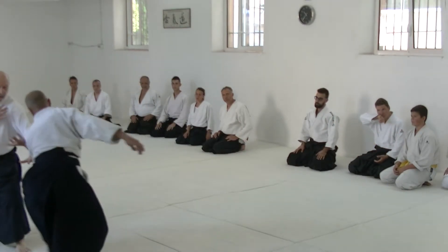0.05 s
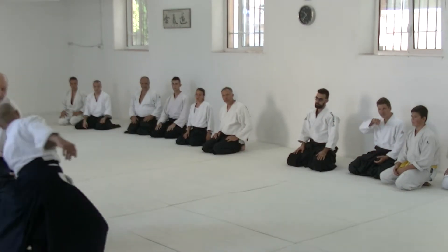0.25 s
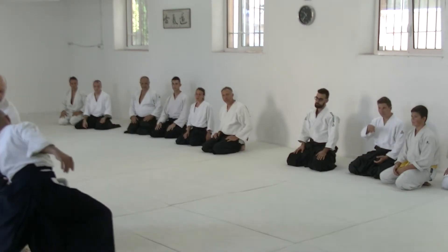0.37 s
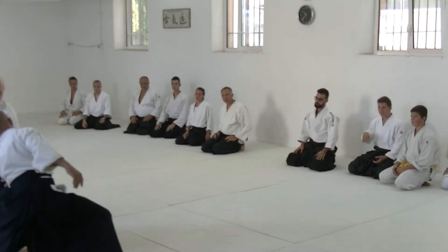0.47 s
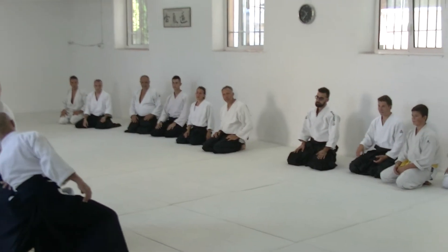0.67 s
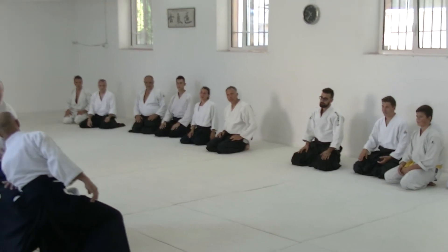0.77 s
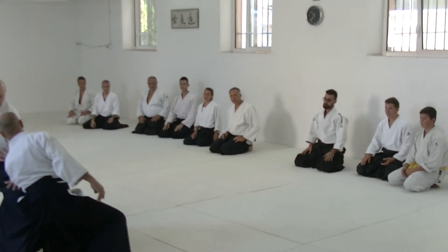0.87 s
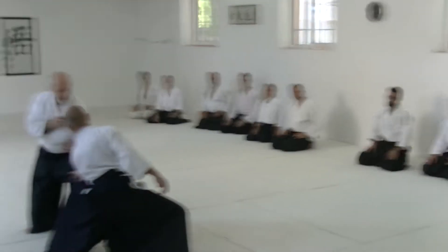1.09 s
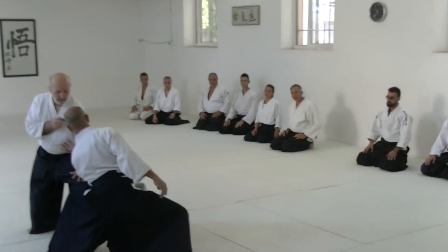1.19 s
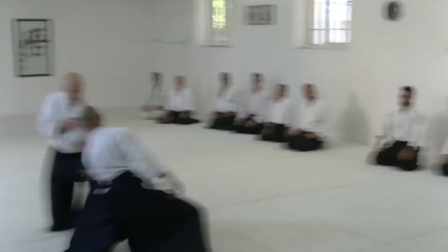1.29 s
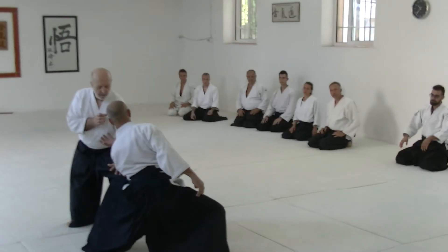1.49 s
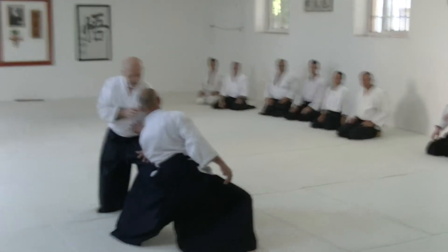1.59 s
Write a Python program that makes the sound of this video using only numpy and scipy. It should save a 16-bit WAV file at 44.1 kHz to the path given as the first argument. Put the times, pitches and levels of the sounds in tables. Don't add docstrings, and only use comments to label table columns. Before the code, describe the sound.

A body thuds heavily onto a padded mat in an echoing hall, then three sharp clicks

```python
import sys
import numpy as np
from scipy import signal
from scipy.fft import rfft, irfft
from scipy.io import wavfile
from scipy.ndimage import uniform_filter1d

SR = 44100
rng = np.random.default_rng(int(sys.argv[2]) if len(sys.argv) > 2 else 0)


def int16_out(signal):
    q = np.round(np.clip(np.atleast_2d(signal).T, -1, 1) * 32767)
    wavfile.write(sys.argv[1], SR, q.astype(np.int16))


def invert_db(x):
    u = np.asarray(x, float) / 20
    return 10 ** u


N = 72765
LEAD_S = .4

# f/Hz, density/(dB per Hz)
AIR_SPECTRUM = [(15, -35), (25, 3.5), (70, -11), (394, -9), (545, -12), (863, -12), (1230, -16),
                (1400, -18), (16000, -37)]
# f/Hz, coefficient/1
AIR_CORRELATION = [(60, 0.89), (180, 0.61), (550, 0.73), (1650, 0.42), (4970, -0.23), (15000, 0.2)]
# f/Hz, T60/s
HALL_DECAY = [(60, 0.8), (150, 0.83), (400, 0.71), (1200, 0.75), (4000, 0.74), (12000, 0.49)]
# f/Hz, level/dB
HALL_SPECTRUM = [(40, -11), (100, -3), (160, -7.5), (250, 3.5), (500, 0.5), (1500, 3), (5000, -2.5),
                 (14000, 1.5)]
# f/Hz, coefficient/1
HALL_CORRELATION = [(60, 0.93), (180, 1), (550, 0.93), (1650, 0.38), (4970, -0.38), (15000, 0.092)]
# f/Hz, density/(dB per Hz)
SHUDDER_SPECTRUM = [(25, 1), (40, -19), (52, 1), (70, -5), (98, 5), (130, -1), (300, -50)]

# f/Hz, density/(dB per Hz)
CLICK_SPECTRUM = [(900, 7), (1650, -14), (2100, -6), (2700, -2), (3500, -20), (8000, -11), (16000, -27)]
# f/Hz, left level/dB, right level/dB, T60/s
CLICK_MODES = [(1640, -4, -7, 0.018), (2650, -2, 3, 0.015), (4170, -7, -13, .012), (5170, -6, -11, .012),
               (6900, -13, -15, .01)]

# t/s, snap level/dB, lead of scrape/s, scrape level/dB, spring level/dB
LATCH_SNAPS = [
    (1.0788, -14.5, 0.0053, -27, -50),
    (1.3383, -17.5, 0.0068, -30.5, -49.5),
    (1.5841, -20.5, 0.0053, -43, -51),
]
# f/Hz, density/(dB per Hz)
SNAP_SPECTRUM = [(880, -28), (1500, -4.5), (3410, -4.5), (8160, -9.5), (10300, -12), (11700, -7.5),
                 (16000, -24)]
# f/Hz, density/(dB per Hz)
RATTLE_SPECTRUM = [(700, 8.5), (1100, 11.5), (2000, -13), (3200, 15.5), (5000, -22), (9000, -30),
                   (16000, -38)]
# f/Hz, left level/dB, right level/dB, T60/s
LATCH_MODES = [(967, -5.5, -29.5, 0.049), (1323, -19.5, -12.5, 0.069), (2600, -13, -7, 0.026),
               (3335, -14.5, -4.5, 0.022), (4230, -41, -37, 0.16), (5360, -13, -5, 0.028),
               (5879, -14, -32.5, 0.086), (8140, -7, -35, 0.024), (9650, -18, -28, 0.021),
               (13810, -31, -40, 0.044)]

# t/s, knock level/dB, strike level/dB, left tick level/dB, right tick level/dB
LEVER_KNOCKS = [
    (1.024, -10.5, -10.5, -11.5, -17),
    (1.0527, -39, -39, -31, -37),
    (1.092, -25.5, -40, -60, -60),
    (1.2850, -12.5, -32.5, -35, -32.5),
    (1.2912, -20, -55, -48, -51),
    (1.5300, -15, -25.5, -36, -34),
    (1.5359, -24, -38, -56, -48),
]
# f/Hz, left level/dB, right level/dB, T60/s
ROCKING_MODES = [(100, -32, -21, 0.19), (208, -21.5, -10, 0.08), (278, -2, -2.5, .06),
                 (351.4, -3.5, 5.5, 0.066)]
# f/Hz, left level/dB, right level/dB, T60/s
SHAKING_MODES = [(388.8, -8.5, -8, 0.085), (587, -8, -17, 0.056), (658, -17, -29.5, 0.073),
                 (862, -18, -20, 0.041), (1043, -16, -26, 0.067), (1150, -20.5, -15, 0.032),
                 (1240, -24, -24.5, 0.035)]
# f/Hz, left level/dB, right
# level/dB, T60/s
STRUCK_MODES = [(451, 2, -17, 0.052), (558, -4.5, -13, 0.053), (689.4, -4.5, -18, 0.066),
                (769, 2, -23, 0.022), (923, -22, -1, 0.024), (1097, -26, 4.5, 0.014),
                (1292, -12, -6.5, 0.052), (1980, -18, -28, 0.022)]
# f/Hz, density/(dB per Hz)
TICK_SPECTRUM = [(880, -45), (1500, 3), (4590, -9), (5380, -8.5), (9280, -14), (12000, -6), (16000, -25)]
# f/Hz, density/(dB per Hz)
BUZZ_SPECTRUM = [(300, -23), (600, -37), (1000, 3.5), (2500, -6), (6000, -22), (10000, -30), (16000, -58)]

# start t/s, swell/s, fade/s, level/dB
CLOTH_DRAGS = [
    (-.05, 0.041, 0.18, -49),
    (0.171, 0.041, 0.0033, -40.5),
    (0.235, 0.0083, 0.059, -33.5),
    (0.393, 0.036, 0.029, -36),
    (0.469, 0.031, 0.088, -60),
]
# f/Hz, density/(dB per Hz)
CLOTH_SPECTRUM = [(530, 15), (900, 2), (1280, -9), (1490, -3), (1640, -7.5), (5890, -9), (16000, -21.5)]
# t/s, level/dB, brightness/1
PALM_CRACKS = [(0.2119, -30, 0), (0.214, -37, 0.4), (0.2189, -29, 0.1), (0.2227, -23, 0.6),
               (0.2254, -40.5, 0.37), (0.2374, -36, 0), (0.239, -28.5, 0.37), (0.2485, -32, 0.06),
               (.2520, -36, .1), (.4280, -35.5, 0.33)]
# f/Hz, density/(dB per Hz)
DULL_SPECTRUM = [(800, -8), (2000, 6), (4500, -9.5), (8000, -19), (16000, -43)]
# f/Hz, density/(dB per Hz)
BRIGHT_SPECTRUM = [(2000, -2), (6000, -3.5), (11500, 0.5), (14000, -4), (16500, -32)]
# t/s, thud level/dB, thud f/Hz, swings of the floor/1, slap level/dB
LIMB_LANDINGS = [(-.09, -7, 498, 0.37, -32), (-.05, -17, 220, 0.3, -36.5), (-.02, -15, 121, 0.75, -27),
                 (.020, -25.5, 216, 1.13, -70), (0.205, -10, 255, 0.31, -34), (0.211, -2, 169, 0.3, -32.5),
                 (.2170, -8, 167, 0.2, -37), (0.2231, -1.5, 177, 0.37, -23.5),
                 (0.219, -16, 505, 1.75, -27.5), (0.2374, -18, 220, 0.43, -40), (0.259, -17, 410, 0.8, -28),
                 (.2950, -15, 202, 0.66, -41), (.4020, -25.5, 200, 0.94, -73),
                 (0.4382, -21, 470, 0.63, -44.5), (0.445, -25.5, 530, 1.74, -53), (0.451, -22, 130, 1, -71),
                 (.5000, -24, 103.8, 6.1, -40.5)]
# f/Hz, density/(dB per Hz)
SLAP_SPECTRUM = [(600, 9), (1000, 1.5), (2000, -5), (3500, -7.5), (6000, -14.5), (11500, -23), (16000, -44)]


def read(points, hz):
    f, value = np.transpose(points)
    return np.interp(np.log(hz + 1), np.log(f + 1), value)


def evened(x):
    return x / np.sqrt(np.mean(x ** 2) + 1e-20)


def add(mix, s, sound):
    part = mix[..., max(round(s * SR), 0):][..., :sound.shape[-1]]
    part += sound[..., :part.shape[-1]]


def coloured(points, size, low_hz, channels=2):
    hz = np.fft.rfftfreq(size, 1 / SR)
    white = rfft(rng.standard_normal((channels, size)))
    gain = invert_db(read(points, hz)) / (1 + (low_hz / (hz + 1)) ** 4)
    return evened(irfft(white * gain, size))


def burst(t, rise, fall):
    u = np.maximum(t, 0)
    return (1 - np.exp(-u / rise)) * np.exp(-u / fall)


def pair(size, same, shape):
    frames, hz = size // 256 + 5, np.fft.rfftfreq(1024, 1 / SR)[:, None]
    a, b, c, d = rng.standard_normal((frames, 513, 4)).T
    like = np.clip(read(same, hz), -1, 1)
    left, other = a + 1j * b, c + 1j * d
    right = like * left + np.sqrt(1 - like ** 2) * other
    z = np.array([left, right]) * invert_db(shape(hz, np.arange(frames) * 256 / SR))
    return evened(signal.istft(z, nperseg=1024, noverlap=768)[1][:, :size])


def rings(modes, t, left_sign):
    hz, left_db, right_db, t60 = np.transpose(modes)[:, :, None]
    tones = np.sin(2 * np.pi * hz * t) * invert_db(-60 * t / t60)
    left = (invert_db(left_db) * tones).sum(0)
    right = (invert_db(right_db) * tones).sum(0)
    return np.array([left_sign * left, right])


def pushed(rung, push_s):
    push = np.exp(-2 * (np.arange(300) / SR / push_s - 2) ** 2)
    return signal.oaconvolve(rung, push[None] / push.sum(), axes=1)[:, :rung.shape[1]]


def low_cut(x, cut_hz):
    return signal.sosfilt(signal.butter(3, cut_hz, "high", fs=SR, output="sos"), x)


def air():
    def swell(t):
        waves = [np.sin(2 * np.pi * (f * t + rng.random())) / np.sqrt(f) for f in np.geomspace(.5, 12, 20)]
        return evened(sum(waves))

    level_db = -52
    return invert_db(level_db) * pair(N, AIR_CORRELATION, lambda hz, t: read(AIR_SPECTRUM, hz) + swell(t))


def hall(x):
    level_db, delay_s = -4.5, 0.0048
    tail = pair(SR, HALL_CORRELATION, lambda hz, t: read(HALL_SPECTRUM, hz) - 60 * t / read(HALL_DECAY, hz))
    tail = tail * np.clip(np.arange(SR) / SR / delay_s - .5, 0, 1)
    response = tail / np.linalg.norm(tail[0])
    return invert_db(level_db) * signal.fftconvolve(x[None], response, axes=1)[:, :len(x)]


def shudder(blows):
    level_db, fade_s = -33, 0.061
    keep = np.exp(-1 / (fade_s * SR))
    power = np.minimum(uniform_filter1d(blows ** 2, size=900), .004)
    force = np.sqrt(signal.lfilter([1 - keep], [1, -keep], power) + 1e-12)
    return invert_db(level_db) * force / force.max() * coloured(SHUDDER_SPECTRUM, len(blows), 11, channels=1)


def click():
    t = np.arange(5000) / SR
    noise = invert_db(-2) * burst(t, 0.0002, .0022) * coloured(CLICK_SPECTRUM, len(t), 770)
    modes = rings(CLICK_MODES, t, 1) * np.minimum(t / 0.002, 1)
    return invert_db(-22) * (noise + modes)


def snaps():
    out, t = np.zeros((2, N)), np.arange(12000) / SR
    metal = rings(LATCH_MODES, t, -1) * np.minimum(t / 0.0023, 1)
    spring_hz, spring_t60 = 1718, .35
    spring = np.sin(2 * np.pi * spring_hz * t) * burst(t, .012, spring_t60 / np.log(1000))
    same = -0.27
    crack_s, bounce_s, bounce_db = .0014, 0.00336, -4
    crack = burst(t, 0.00096, crack_s) + invert_db(bounce_db) * burst(t - bounce_s, .0001, crack_s)
    for s, snap_db, lead, scrape_db, spring_db in LATCH_SNAPS:
        a, b = coloured(SNAP_SPECTRUM, len(t), 860)
        grit = np.array([a, same * a + np.sqrt(1 - same ** 2) * b])
        rattle = invert_db(-10) * coloured(RATTLE_SPECTRUM, len(t), 330) * burst(t, 0.00032, .004)
        add(out, s, invert_db(snap_db) * (grit * crack + rattle + metal) + invert_db(spring_db) * spring)
        add(out, s - lead, invert_db(scrape_db) * grit[:, ::-1] * burst(t, 0.0001, .004))
    return out


def knocks():
    out, t = np.zeros((2, N)), np.arange(5000) / SR
    late = np.maximum(t - .0028, 0)
    rocking = pushed(rings(ROCKING_MODES, t, -1) * (1 - np.exp(-t / .002)), .0008)
    shaking = pushed(rings(SHAKING_MODES, late, 1), .0003)
    struck = rings(STRUCK_MODES, late, -1) * (1 - np.exp(-late / .0015))
    tick_s, lead_s = .0008, 0.00182
    contact = burst(late, 0.000067, tick_s)
    contact += invert_db(-7.5) * burst(late, 0.00048, 0.0029)
    contact += invert_db(-12.5) * burst(t - .0028 + lead_s, .0001, tick_s)
    for s, knock_db, strike_db, left_db, right_db in LEVER_KNOCKS:
        buzz = invert_db(-18) * burst(t - .002, .0015, .011) * coloured(BUZZ_SPECTRUM, len(t), 490)
        tick = invert_db([[left_db], [right_db]]) * contact * coloured(TICK_SPECTRUM, len(t), 1130)
        add(out, s, invert_db(knock_db) * (rocking + shaking + buzz) + invert_db(strike_db) * struck + tick)
    add(out, .4962, click())
    return low_cut(out, 70)


def cloth():
    size = N + round(LEAD_S * SR)
    t = np.arange(size) / SR - LEAD_S
    drag = np.zeros(size)
    for s, swell, fade, db in CLOTH_DRAGS:
        rising = np.clip((t - s) / swell, 0, 1) ** 2
        dying = np.exp(-np.maximum(t - s - swell, 0) / fade)
        drag += invert_db(db) * np.where(t < s + swell, rising, dying)
    crinkle = invert_db(1.5 * evened(uniform_filter1d(rng.standard_normal(size), size=120)))
    return drag * crinkle * coloured(CLOTH_SPECTRUM, size, 980)


def cracks():
    out, t = np.zeros((2, N)), np.arange(2000) / SR
    for s, db, bright in PALM_CRACKS:
        dull_part = np.sqrt(1 - bright) * coloured(DULL_SPECTRUM, len(t), 660)
        bright_part = np.sqrt(bright) * coloured(BRIGHT_SPECTRUM, len(t), 1500)
        grit = dull_part + bright_part
        add(out, s, invert_db(db + 9) * (grit + grit.mean(0)) * burst(t, 0.00035, .0007))
    return out


def landings():
    out, t = np.zeros(N + round(LEAD_S * SR)), np.arange(-4000, 4000) / SR
    slap_s, slap_rise_s, floor_cut_hz = 0.0019, 0.00074, 115.7
    for s, thud_db, hz, swings, slap_db in LIMB_LANDINGS:
        thud = np.cos(2 * np.pi * hz * t) * np.exp(-.5 * (t * hz / swings) ** 2)
        envelope = burst(t + 2 * slap_rise_s, slap_rise_s, slap_s)
        slap = coloured(SLAP_SPECTRUM, len(t), 424, channels=1)[0] * envelope
        add(out, LEAD_S + s + t[0], invert_db(thud_db) * thud + invert_db(slap_db + 14) * slap)
    forward = low_cut(out, floor_cut_hz)
    return low_cut(forward[::-1], floor_cut_hz)[::-1]


def scene():
    blows, rubbing = landings(), cloth()
    ear_lag_s = .0001
    direct = np.array([blows, np.roll(blows, round(ear_lag_s * SR))])
    near = direct + rubbing + shudder(blows)
    fall = (near + hall(blows + rubbing[0]))[:, -N:]
    return fall + knocks() + snaps() + air() + cracks()


def top_cut(x):
    return signal.sosfilt(signal.butter(12, 16540, fs=SR, output="sos"), x)


def record(dry):
    mix = np.tanh(dry / 1.342) * 1.672
    return top_cut(mix)


dry = scene()
out = record(dry)
int16_out(out)
```